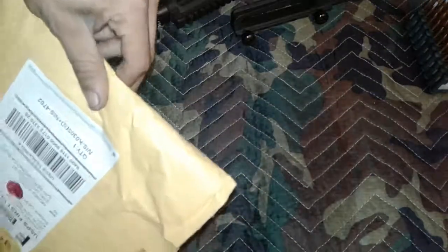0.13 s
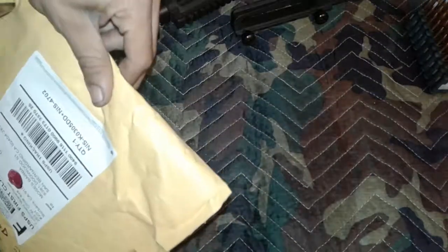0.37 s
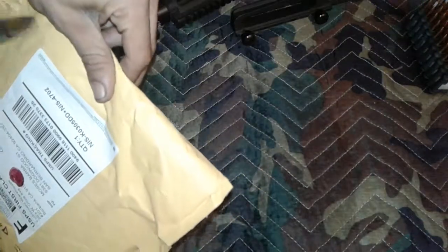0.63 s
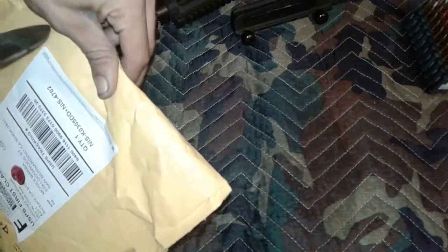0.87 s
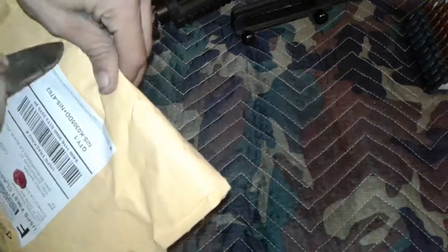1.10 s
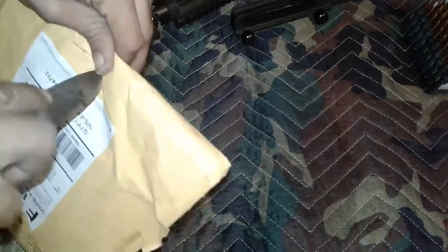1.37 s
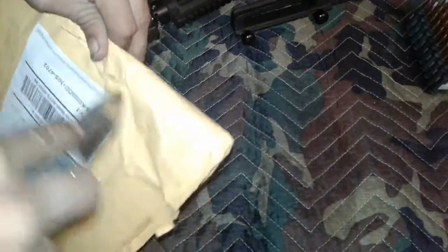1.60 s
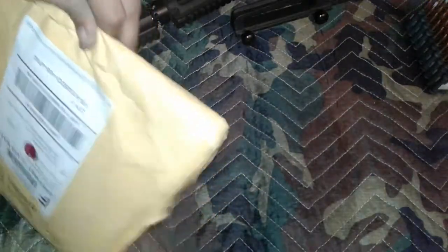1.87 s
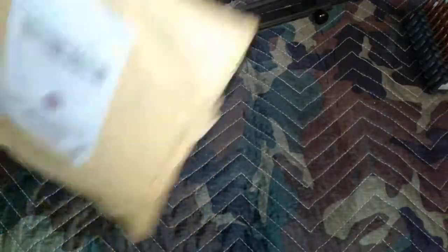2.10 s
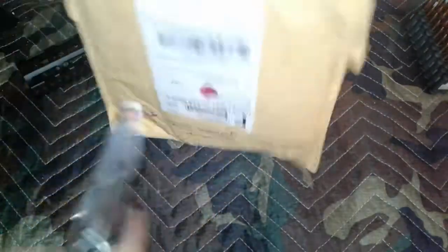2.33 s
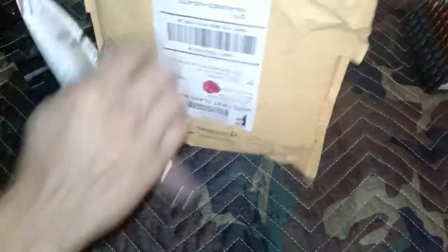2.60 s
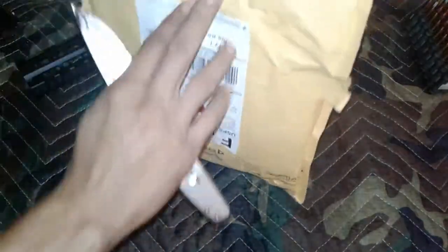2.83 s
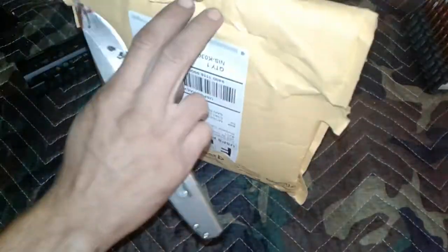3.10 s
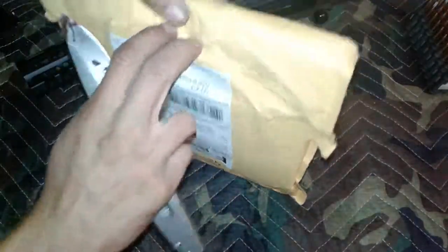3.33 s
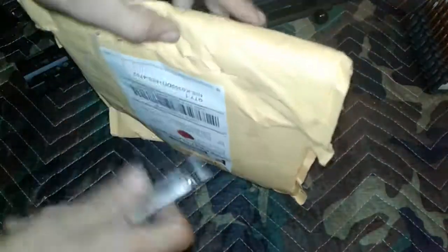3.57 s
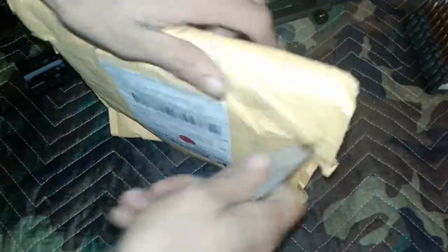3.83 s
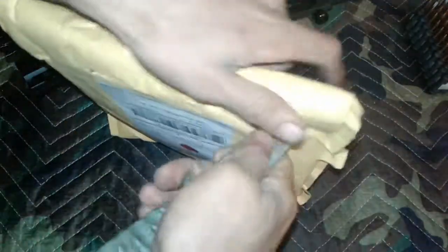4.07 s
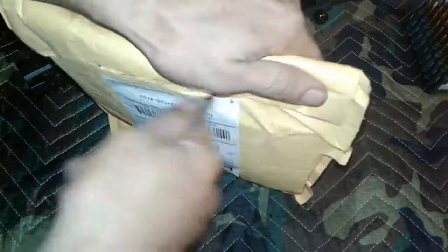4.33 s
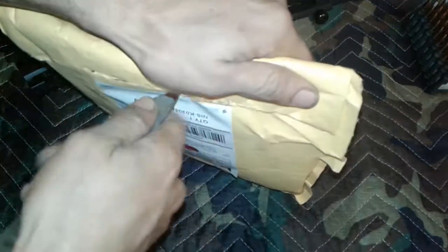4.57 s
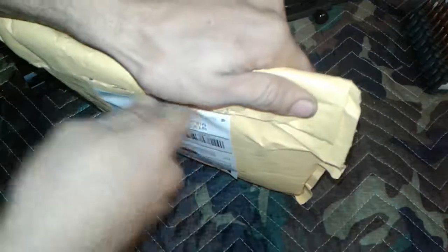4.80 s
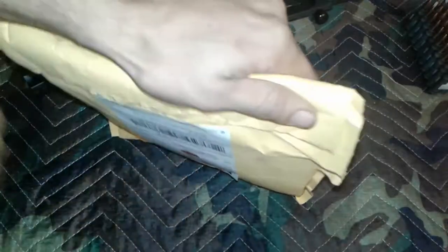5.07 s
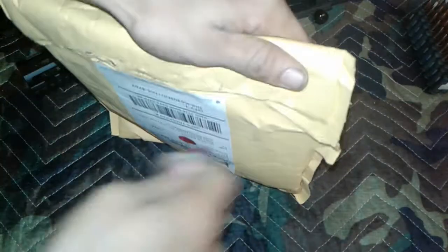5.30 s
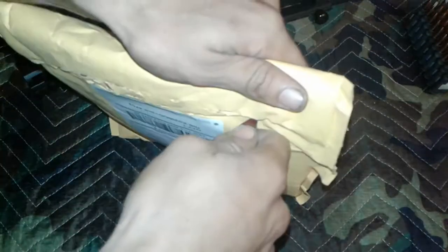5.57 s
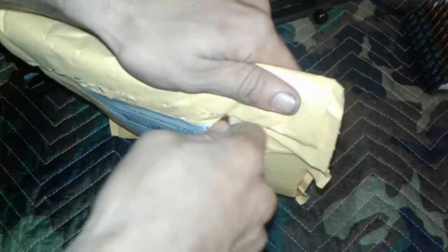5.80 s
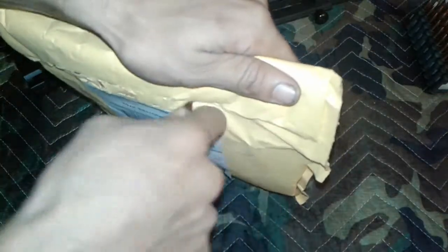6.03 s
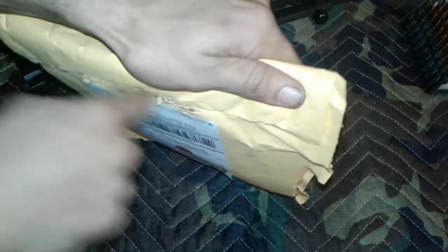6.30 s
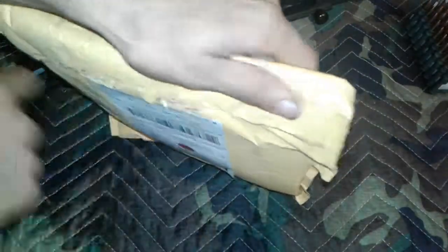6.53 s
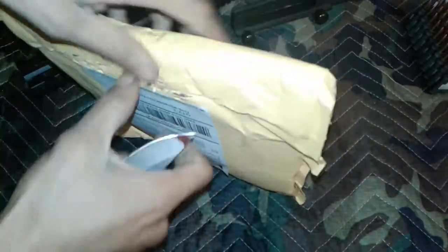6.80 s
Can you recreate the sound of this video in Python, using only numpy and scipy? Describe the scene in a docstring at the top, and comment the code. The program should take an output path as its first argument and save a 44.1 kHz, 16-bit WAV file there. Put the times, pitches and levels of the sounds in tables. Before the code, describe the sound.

A padded paper mailer is slit with a knife and squeezed by hand, giving dry crackles, sharp snaps and short fibrous rips close up indoors.

```python
"""A padded paper mailer is slit with a knife, turned and squeezed by hand, close to a two-port microphone indoors.
Creases snap and fibres tear in swarms: random envelopes gate noise split into crackle, boom and hiss.
Ringing padding modes and small pitched pops colour the paper; low decaying sines are knocks on the table.
A delayed copy at each port is the table echo; a short noise tail is the room, over air noise and mains hum."""
import sys
import numpy as np
from scipy import signal
from scipy.fft import rfft, irfft, next_fast_len
from scipy.io import wavfile
from scipy.ndimage import uniform_filter1d, map_coordinates

SR = 44100
rng = np.random.default_rng(int(sys.argv[2]) if len(sys.argv) > 2 else 0)


def wav_record(signal):
    """Record a signal, one row per channel, as 16-bit PCM in the file named by sys.argv[1]."""
    frames = np.transpose(np.atleast_2d(signal))
    bounded = np.clip(frames, -1, 1)
    # unit amplitude maps onto the largest positive 16-bit level
    quanta = np.round(bounded * 32767).astype(np.int16)
    wavfile.write(sys.argv[1], SR, quanta)


def ratio(d):
    """dB to gain"""
    e = np.asarray(d, float) / 20
    return 10 ** e


N = 304731  # samples

# single creases that snap, levels ahead of the trims in snaps():
# (start [s], level [dB], boom re level [dB], hiss re level [dB])
SNAPS = [(.106, -42.5, -4.5, -21), (.254, -34.5, -24.5, -20), (0.294, -24, -17.5, -17),
         (.58, -16.5, -39.5, -29), (.63, -23.5, -13.5, -19), (.791, -21.5, -19.5, -14),
         (.835, -22, -34, -14.5), (.885, -44.5, -27, -7.5), (.963, -21, -24, -8), (1.102, -33, -20, -19.5),
         (1.183, -43, -21.5, -1), (1.205, -43, -21, -3), (1.282, -24, -22, -32), (1.325, -11, -32.5, -13),
         (1.352, -22, -30, -12), (1.473, -53.5, -1, 2), (1.56, -29, -15.5, -6), (1.615, -15, -19, -23.5),
         (1.633, -19.5, -19.5, -27.5), (1.781, -49, -21, -30), (1.799, -44, -31, -13),
         (1.815, -8, -15.5, -28.5), (1.852, -22, -17.5, -6.5), (2.063, -39.5, -12.5, -12),
         (2.263, -32.5, -10, -20), (2.473, -31, -41, -26.5), (2.544, -18.5, -35, -32.5),
         (2.615, -32, -20.5, -21), (2.794, -28, -10.5, -20), (2.838, -27, -44.5, -23.5),
         (2.924, -31, -12, -30), (2.981, -28.5, -15, -24), (3.027, -35.5, -12, -33), (3.157, -41.5, -11, 0),
         (3.25, -22, -18, -15), (3.326, -19, -23, -9), (3.363, -42.5, -9, 2.5), (3.387, -15, -24, -23.5),
         (3.435, -29, -23.5, -24), (3.476, -26.5, -27, -25), (3.644, -32, -28, -23), (4.092, -18, -28, -16),
         (4.244, -17.5, -41, -29), (4.3, -16.5, -25.5, -31), (4.324, -9, -17, -29),
         (4.372, -21, -10.5, -14), (4.416, -24.5, -18, -20.5), (4.458, -23, -20, -6.5),
         (4.568, -33.5, -22.5, -15), (4.656, -38, -28.5, -18), (4.806, -13.5, -30, -26),
         (4.845, -19, -21, -27.5), (4.907, -12, -23, -29.5), (4.943, -8, -14, -26), (5.359, -43, -16, -8.5),
         (5.526, -24, -19.5, -15), (5.698, -43, -22.5, -4), (5.731, -25, -10.5, -9),
         (5.866, -18, -7.5, -24.5), (6.024, -30.5, -22, -9), (6.139, -39, -17, -19.5),
         (6.189, -42.5, -39, -3.5), (6.225, -23, -20.5, -19.5), (6.29, -6.5, -26.5, -21),
         (6.352, -12.5, -10.5, -18.5), (6.412, -30.5, -9.5, -29), (6.47, -34.5, -14, -29.5),
         (6.566, -37, -14, -18.5), (6.589, -24, -28.5, -19), (6.843, -30, -11.5, -23.5),
         (6.895, -24.5, -34.5, -35.5)]


def unit(x):
    """Scale to rms 1."""
    return x / np.sqrt(np.mean(x ** 2))


def curves(table):
    """Columns of a time table, drawn as straight lines with one value per sample."""
    s, *columns = np.transpose(table)
    return np.array([np.interp(np.arange(N) / SR, s, column) for column in columns])


def colour(x, points):
    """Causal minimum-phase filter through (Hz, dB) points, built from the cepstrum."""
    hz, db = np.transpose(points)
    grid = np.maximum(np.arange(1025) * SR / 2048, 1)
    log_gain = np.interp(np.log(grid), np.log(hz), db) * np.log(10) / 20
    cepstrum = irfft(log_gain)
    # folding the cepstrum onto positive times makes the filter causal
    cepstrum[1:1024] *= 2
    cepstrum[1025:] = 0
    impulse = irfft(np.exp(rfft(cepstrum)))
    return signal.fftconvolve(x, impulse)[..., :N]


def pole(x, hz, kind="low"):
    """Gentle one-pole filter."""
    return signal.lfilter(*signal.butter(1, hz, kind, fs=SR), x)


def walk(rate):
    """Random levels held 1 / rate s and slewed; spread near 1."""
    hold = int(SR / rate)
    steps = np.repeat(rng.standard_normal(N // hold + 1), hold)
    return uniform_filter1d(steps, hold // 2)[:N]


def delay(x, ms):
    """Read x a moving number of ms late."""
    return map_coordinates(x, [np.arange(N) - ms * SR / 1000], order=3)


def pair(length, hz):
    """Two noises that share their bass below hz and differ above it."""
    both, left, right = rng.standard_normal((3, length))
    return pole(both, hz) + pole(np.array([left, right]), hz, "high")


def hum():
    """Mains hum: steady sines, the same at both ports, each wavering in level on its own."""
    # hum partials: (frequency [Hz], level ahead of a 3.5 dB lift and the wavering [dB])
    partials = [(59.3, -74), (118.6, -69), (215, -73.5), (322, -83.5)]
    out = 0
    for hz, db in partials:
        level = ratio(db + 3.5 + 2.2 * walk(9.3))
        out = out + level * np.sin(2 * np.pi * hz * np.arange(N) / SR)
    return out


def air():
    """Room tone: coloured noise whose bass is common to both ports."""
    # colour of the room tone: (frequency [Hz], relative level per Hz [dB])
    air_colour = [(30, -10), (55, 5), (120, 0), (300, -6.5), (600, -10), (2000, -13.5), (3500, -8),
                  (6500, -24), (8000, -31), (15600, -29)]
    tone = np.array([colour(port, air_colour) for port in pair(N, 187)])
    return ratio(-64) * unit(tone)


def work():
    """Gains (crackle, boom, hiss): each rip swells, rounds over and fades evenly in dB above the steady rubbing."""
    # steady rubbing while the mailer is held in the hands:
    # (time [s], paper crackle [dB], padding boom [dB], fibre hiss [dB])
    hold = [(0.0, -69.5, -78, -63), (.35, -70.5, -57.5, -57.5), (1.0, -78.5, -69.5, -74.5),
            (1.44, -83.5, -70, -76.5), (1.75, -80, -78, -70), (1.97, -75, -69, -70), (2.3, -75, -74, -66),
            (2.5, -73, -70, -51.5), (3.1, -66, -69, -60.5), (3.37, -69.5, -59, -57),
            (3.45, -57.5, -60, -61), (3.9, -55.5, -61, -48), (4.2, -54.5, -64.5, -52.5),
            (4.5, -68, -66, -65), (4.71, -72, -71, -67), (5.05, -59.5, -58, -56.5), (5.2, -69, -70, -62),
            (5.45, -65.5, -69.5, -59), (5.6, -81.5, -72, -61.5), (5.78, -59, -67, -63),
            (6.12, -72.5, -65.5, -54.5), (6.5, -59, -62, -53), (6.91, -57, -60.5, -51)]
    # rips, cuts and squeezes: (peak time [s], swell [dB per ms], fade [dB per ms],
    # crackle [dB], boom re crackle [dB], hiss re crackle [dB])
    tears = [(0.026, .04, .7, -42.5, -5, -5), (.113, .8, .7, -50, -7, -6), (.301, .15, .18, -54, -9.5, 4),
             (.456, .22, .05, -47, -9, -2.5), (.57, .07, .1, -50.5, -2.5, -1.5),
             (0.643, .7, .4, -38.5, -5, 1), (0.699, .25, .18, -51, -13.5, 5.5), (.89, .45, .25, -53, -7, 4),
             (0.975, .75, .6, -33, -5, 2), (1.107, .35, .4, -74, 1.5, 16), (1.22, .7, .17, -54.5, -6, 13.5),
             (1.285, .55, .75, -33, -6, 6.5), (1.346, .4, .7, -44, -9, 7),
             (1.578, .36, .27, -42, -9.5, 6.5), (1.629, .45, .55, -33, -9.5, 5),
             (1.806, .95, .17, -33, -16, 1), (1.857, .45, .65, -27.5, 4, 4),
             (2.268, .55, .7, -55, -3.5, -15.5), (2.378, .6, .08, -48.5, -7.5, -1),
             (2.553, .33, .12, -47, -7.5, -7.5), (2.74, .17, .55, -47.5, -3.5, -1),
             (2.793, .7, .4, -46.5, -9, -1), (2.85, .2, .8, -50.5, -11, 0.5),
             (2.927, .7, .55, -51.5, -5, -2.5), (2.985, .7, .4, -52.5, -6, 1.5),
             (3.046, .3, .7, -49, -7, 8), (3.18, .25, .3, -65, -1, 8), (3.399, 1.3, .8, -60, 5.5, 18.5),
             (3.955, .25, .13, -46, -6.5, 3), (4.125, .6, .07, -46.5, -3, 3.5),
             (4.321, .06, .25, -41, -23, 1.5), (4.427, .8, .4, -37, -10, 1),
             (4.655, .08, .55, -57.5, -8, 2), (4.781, .2, .18, -52, -14.5, 6.5),
             (4.819, .8, .18, -30, -9, 0), (4.95, .18, .43, -29, -1, -0.5), (5.37, .15, .15, -66, -5, 7),
             (5.52, .4, .3, -57, -4, 5.5), (5.735, .33, .33, -51, 4, 5), (5.906, .14, .6, -42.5, -8, -0.5),
             (6.035, .3, .55, -44.5, -10, 3), (6.237, .3, .37, -34, -9.5, -0.5),
             (6.3, 1.1, .25, -29, -15, -6.5), (6.371, .29, .39, -32, -4.5, -2)]
    crest_db = 4  # rounding of a rip's top
    ms = np.arange(N) * 1000 / SR
    power = ratio(curves(hold)) ** 2
    for s, swell, fade, db, boom_db, hiss_db in tears:
        late = ms - 1000 * s
        slope = np.where(late < 0, swell, fade)
        shape = ratio(crest_db - np.hypot(late * slope, crest_db))
        levels = ratio(db + np.array([[0], [boom_db], [hiss_db]]))
        power = power + (levels * shape) ** 2
    return np.sqrt(power)


def swarm(rate, spread_db, t60, tint_db):
    """Envelopes (crackle, boom, hiss) of random creases, mostly small, each with its own tint and a short tail."""
    sizes_db = np.minimum(spread_db * rng.exponential(size=N), 22)
    kicks = (rng.random(N) < rate / SR) * ratio(sizes_db)
    tints = ratio(tint_db * rng.standard_normal((3, N)))
    keep = np.exp(-np.log(1000) / (t60 * SR))
    return unit(signal.lfilter([1], [1, -keep], kicks * tints))


def rustle(gains):
    """Fine tearing grain and some larger creases over a rubbing that comes in jerks."""
    # creases per s, spread of sizes [dB], tail T60 [s], spread of tints [dB]
    grain = swarm(1200, 4.96, 0.00564, 7.1)
    larger = ratio(-7.5) * swarm(110, 13.2, 0.0065, 7.45)
    rubbing = ratio(5.5)
    jerks = ratio(1.8 * walk(50))
    return gains * unit((grain + larger + rubbing) * jerks)


def padding(sheet):
    """The padding answers the paper with a few damped resonances."""
    # mailer modes: (frequency [Hz], width [Hz], gain [dB])
    modes = [(168.2, 18.8, -11.5), (372.2, 23.8, -6.5), (976, 197, -15)]
    return sum(ratio(db) * signal.lfilter(*signal.iirpeak(hz, hz / width, SR), sheet) for hz, width, db in modes)


def paper(envelopes):
    """One turbulence gated by the creases; crackle, boom and hiss share out the paper's colour."""
    # colour of paper and microphone: (frequency [Hz], relative level per Hz [dB])
    paper_colour = [(45, -35.5), (100, -12), (160, -7), (350, 1.5), (600, -1), (1100, 1), (2000, -4.5),
                    (3400, -4), (6200, -8), (7600, -15), (10000, -16.5), (15600, -17.5)]
    boom_hz, hiss_hz = 733, 3275  # boom lies below, hiss above, crackle between
    size = next_fast_len(N)
    noise = rng.standard_normal(N)
    hz = np.arange(size // 2 + 1) * SR / size
    # every snap opens with the same quick inward pull of the sheet
    pull = np.array([1, 1, -1, -3, -4, -3, -1, 1, 2]) * ratio(-3)
    for s, *_ in SNAPS:
        noise[int(s * SR):int(s * SR) + 9] = pull
    boom = 1 / (1 + (hz / boom_hz) ** 4)
    hiss = 1 - 1 / (1 + (hz / hiss_hz) ** 4)
    shares = np.array([1 - boom - hiss, boom, hiss])
    # level of each coloured share without gating, so that the envelopes set the levels
    plain = irfft(shares * rfft(colour(noise, paper_colour), size), size).std(axis=1, keepdims=True)
    gated = rfft(noise * envelopes / plain, size)
    sheet = colour(irfft(np.sum(shares * gated, axis=0), size), paper_colour)
    return sheet + padding(sheet)


def facets(crackle):
    """Flat patches between creases pop one at a time, each ringing a few cycles at its own pitch."""
    # patch pitches: (frequency [Hz], level re crackle gain [dB])
    patches = [(520, -17.5), (800, -9), (1250, -17.5), (1800, -4), (2600, -18), (3500, -10.5),
               (4800, -13.5), (6100, -11.5)]
    out = 0
    for hz, db in patches:
        sizes_db = np.minimum(6.68 * rng.exponential(size=N), 20)
        kicks = (rng.random(N) < 45 / SR) * ratio(sizes_db) * rng.choice([-1, 1], N)  # 45 pops per s
        ringing = signal.lfilter(*signal.iirpeak(hz, 5.5, SR), kicks)
        out = out + ratio(db) * crackle * unit(ringing)
    return out


def snaps():
    """Envelopes of single creases: each starts at once and crumbles away unevenly; the boom outlasts it."""
    t60_s = 0.01703  # of the crackle, ahead of the crumbling
    out = np.zeros((3, N))
    crumble = ratio(2.45 * walk(900))
    for s, db, boom_db, hiss_db in SNAPS:
        i = int(s * SR)
        age = np.arange(min(SR // 10, N - i)) / SR / t60_s
        tails = np.exp(-np.log(1000) * np.outer([1, .6, 1.1], age))  # crackle, boom, hiss
        levels = ratio(db + 0.5 + np.array([[-12], [boom_db], [hiss_db]]))
        out[:, i:i + len(age)] += levels * tails * crumble[i:i + len(age)]
    return out


def thuds():
    """The mailer knocks the table: soft low sines of the table top that rise quickly and die away."""
    # knocks: (time [s], peak level [dB])
    knocks = [(0.973, -60.5), (1.857, -42), (2.716, -53), (4.958, -47), (6.345, -52.5)]
    thud_hz, t60_s, rise_s = 69.2, 0.098, 0.0097
    age = np.arange(SR // 4) / SR
    fade = np.exp(-np.log(1000) * age / t60_s)
    knock = np.sin(2 * np.pi * thud_hz * age) * fade * (1 - np.exp(-age / rise_s))
    hits = np.zeros(N)
    for s, db in knocks:
        hits[int(s * SR)] = ratio(db)
    return signal.fftconvolve(hits, knock / knock.max())[:N]


def far_port(near, envelopes, lag_ms):
    """The right port hears the mailer later, with treble from other parts of the sheet, and shaded."""
    # other parts of the sheet face the far port, mostly in the treble
    other = pole(pole(paper(envelopes), 1960, "high"), 1960, "high")
    far = delay(near, lag_ms) + ratio(7.0) * other
    # the body shades the treble the more the hands are to the side
    dull = pole(far, 1670)
    return dull + (far - dull) * ratio(-4.0 - 41 * lag_ms)


def table_echo(ports):
    """The table reflects the sound to each port, softer and a drifting fraction of a ms to over 1 ms late."""
    # echo delay: (time [s], left [ms], right [ms])
    bounce = [(0, 0.794, 0.9), (.6, 0.837, 0.89), (1.3, .88, 1.29), (1.5, .34, 0.512), (2.0, 0.352, 0.439),
              (2.6, 0.557, 0.686), (3.3, 0.5525, 0.48), (4.2, 0.32, 0.593), (4.9, 0.663, 0.478),
              (6.3, 0.843, 0.459)]
    return np.array([x + ratio(-13) * delay(x, ms) for x, ms in zip(ports, curves(bounce))])


def room(x):
    """A diffuse tail, duller than the source."""
    t60_s, rise_s = 0.133, 0.00328
    age = np.arange(SR // 2) / SR
    decay = np.exp(-np.log(1000) * age / t60_s)
    tail = pole(pair(len(age), 430), 9950) * decay * np.minimum(age / rise_s, 1)
    return ratio(-14.5) * signal.fftconvolve(x[None], unit(tail) / np.sqrt(len(age)))[:, :N]


def scene():
    """Mailer heard at the near left port and the later, shaded right port, in a small humming room."""
    # where the hands work: (time [s], right port lag [ms], left minus right gain [dB])
    where = [(0.0, 0.2035, 4), (1.2, 0.18, 4.5), (2.0, 0.1154, 4), (2.4, 0.069, 2.5), (3.6, 0.084, 4.5),
             (4.0, 0.0124, 3.5), (4.4, 0.0877, 3.5), (4.9, 0.1303, 5), (5.6, 0.048, 3), (6.4, 0.113, 3.5),
             (6.9, 0.096, 3)]
    lag_ms, pan_db = curves(where)
    gains = work()
    envelopes = rustle(gains) + snaps()
    near = paper(envelopes) + facets(gains[0]) + thuds()
    far = far_port(near, envelopes, lag_ms)
    balance = ratio(np.array([pan_db, -pan_db]) / 2)
    return table_echo((near, far)) * balance + room(near) + air() + hum()


def band_limit(x):
    """A steep low-pass at the top of the band."""
    return signal.sosfilt(signal.butter(12, 16800, fs=SR, output="sos"), x)


def record(dry):
    """The microphone loses the deep bass, and a steep filter cuts the top treble."""
    mic_low = signal.butter(2, 55, "high", fs=SR, output="sos")
    top_cut = signal.ellip(8, .2, 40, 15900, fs=SR, output="sos")
    mix = signal.sosfilt(np.vstack([mic_low, top_cut]), dry)
    return band_limit(mix)


dry = scene()
out = record(dry)
wav_record(out)
```